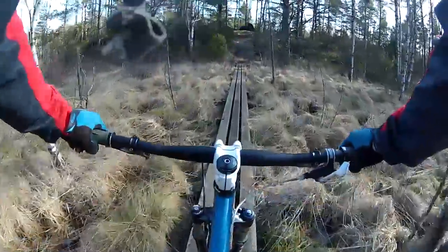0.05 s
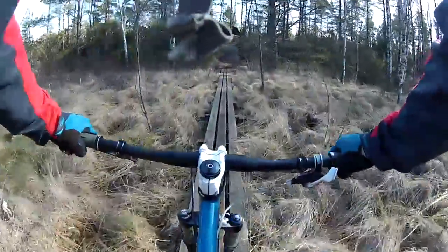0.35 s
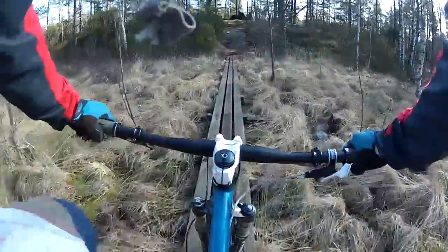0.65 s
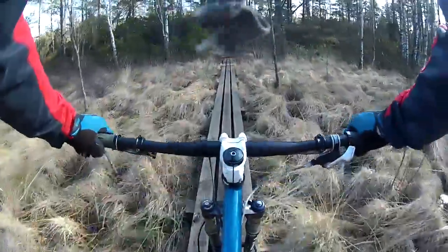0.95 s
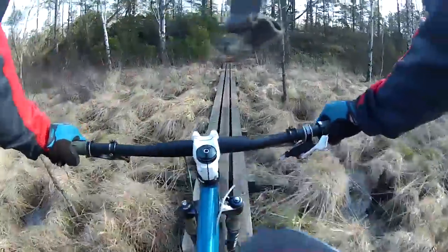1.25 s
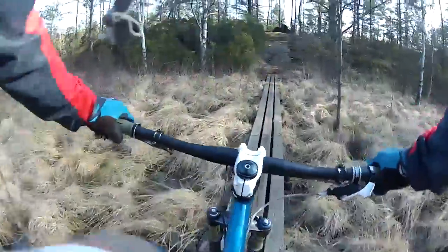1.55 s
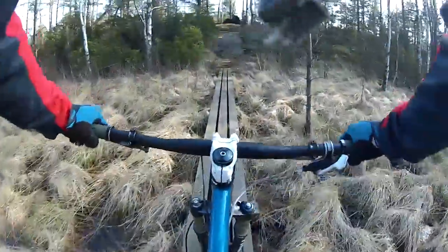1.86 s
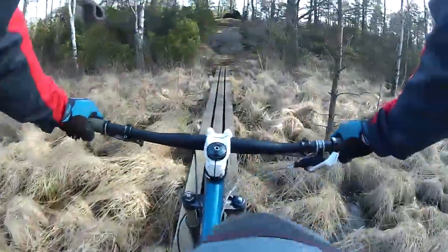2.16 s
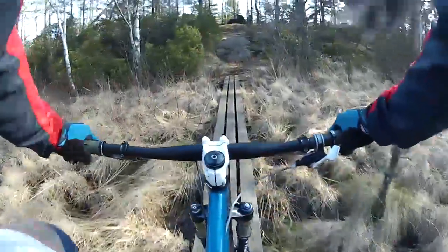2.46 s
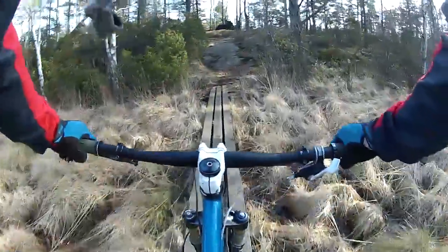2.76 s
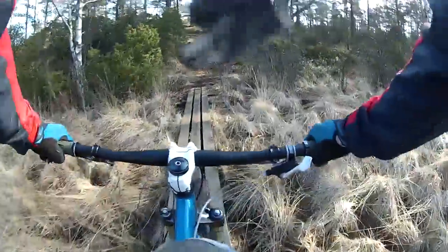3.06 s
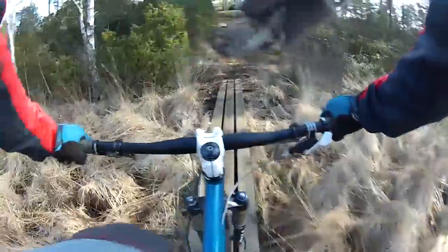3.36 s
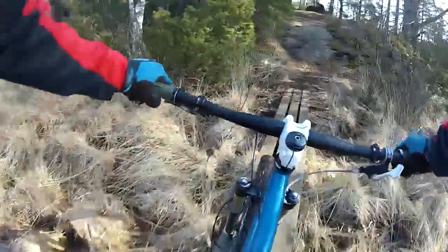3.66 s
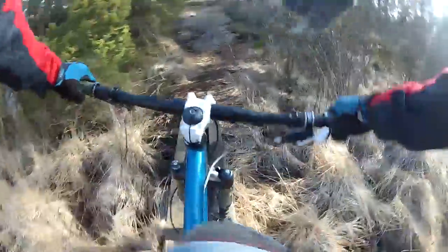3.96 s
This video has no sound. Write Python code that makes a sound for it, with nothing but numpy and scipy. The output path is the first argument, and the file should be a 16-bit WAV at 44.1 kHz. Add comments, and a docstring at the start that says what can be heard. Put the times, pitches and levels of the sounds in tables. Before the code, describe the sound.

Mountain bike tyres rumble over planks, with soft regular thumps and occasional sharp rattles.

```python
"""On a plank boardwalk, a mountain bike rolls along, heard from a cased camera on the rider's chest.
The ride rumbles, the planks drone, and tyres and air make a soft rush that swells now and then.
Soft low thumps come three times a second, probably the rider's pulse through the chest strap.
Jolts bump the case, scrape the jacket across it and make the camera mount clack."""
import sys
import numpy as np
from scipy.fft import rfft, irfft, next_fast_len
from scipy.io import wavfile
from scipy.ndimage import map_coordinates

SR = 44100
rng = np.random.default_rng(int(sys.argv[2]) if len(sys.argv) > 2 else 0)


def store_wav(level_fs):
    """Save 16-bit WAV to argv[1]."""
    pcm = np.round(np.clip(np.atleast_2d(level_fs), -1, 1) * 32767)
    wavfile.write(sys.argv[1], SR, pcm.T.astype(np.int16))


N = 176400  # 4 seconds


def amp(db):
    """Turn decibels into a number to multiply by."""
    return 10 ** (np.asarray(db) / 20)


def unit(x):
    """Scale a sound to an average (rms) level of 1."""
    return x / np.sqrt(np.mean(x ** 2) + 1e-20)


def along(points, hz):
    """Read between (frequency_hz, value) points on a log frequency scale."""
    frequencies, values = np.transpose(points)
    return np.interp(np.log(hz + 1), np.log(frequencies + 1), values)


def curve(rows):
    """Join (time_s, value) points with straight lines, one value per sample."""
    return np.interp(np.arange(N) / SR, *np.transpose(rows))


def bell(hz, centre, half_width):
    """A hump of height 1 around the centre."""
    return 1 / (1 + ((hz - centre) / half_width) ** 2)


def wobble(per_s):
    """A smooth curve through per_s random values a second."""
    values = rng.standard_normal(int(N * per_s / SR) + 4)
    return map_coordinates(values, [np.arange(N) * per_s / SR])


def slips(per_s, spread_db):
    """Tiny random clicks of uneven size."""
    clicks = (rng.random(N) < per_s / SR) * rng.choice([-1, 1], N)
    return unit(clicks * amp(spread_db * rng.standard_normal(N)))


def coloured(x, gain):
    """Filter x so that each frequency is multiplied by gain(hz)."""
    size = 2 * next_fast_len(len(x))
    gains = np.maximum(gain(np.fft.rfftfreq(size, 1 / SR)), 1e-6)
    cepstrum = irfft(np.log(gains))
    # folding this in half makes the filter ring after a hit, never before it
    cepstrum[1:size // 2] *= 2
    cepstrum[size // 2 + 1:] = 0
    return irfft(rfft(x, size) * np.exp(rfft(cepstrum)), size)[:len(x)]


# Tone of the shaking: frequency_hz, gain_db
RUMBLE_TONE = [(10, -17), (20, 6), (33, 0.5), (50, -6), (80, -6.5), (120, -10.5), (180, -19.5),
               (300, -36.5), (800, -73.5)]
# Loudness of the shaking: time_s, level_db
RUMBLE_LEVEL = [(0, -53.5), (1.0, -53), (2.0, -51), (3.0, -50.5), (3.5, -51.5), (4, -52)]

def ride_rumble():
    """The shaking of the ride reaches the camera as a deep, unsteady rumble."""
    shake = unit(coloured(rng.standard_normal(N), lambda hz: amp(along(RUMBLE_TONE, hz))))
    swing_db = 4 * wobble(per_s=15)
    return shake * amp(curve(RUMBLE_LEVEL) + swing_db)


# Tone of the boardwalk: frequency_hz, gain_db
PLANK_TONE = [(60, -15.5), (130, 0), (200, -1), (300, -3.5), (450, -9.5), (700, -16), (1200, -21.5),
              (3000, -78)]
# Loudness of the boardwalk: time_s, level_db
PLANK_LEVEL = [(0, -62.5), (2, -60.5), (3, -61), (4, -58)]

def plank_drone():
    """The boardwalk drones evenly under the wheels."""
    drone = unit(coloured(rng.standard_normal(N), lambda hz: amp(along(PLANK_TONE, hz))))
    return drone * amp(curve(PLANK_LEVEL))


# Tone of the rolling tyres: frequency_hz, gain_db
TYRE_TONE = [(300, -24), (600, -13.5), (900, -11), (1200, -3), (1800, -1), (2200, -3), (2550, -9),
             (2950, -19), (3500, -10.5), (4300, -20.5), (5300, -21), (6000, -34.5), (6700, -25),
             (8500, -21), (9050, -26.5), (10200, -12), (11300, -32.5), (12700, -31), (13900, -15),
             (15000, -29), (15800, -38)]
# Loudness of the rolling tyres: time_s, level_db
TYRE_LEVEL = [(0, -59), (.35, -61), (1.0, -62), (1.3, -55.5), (1.6, -59), (2.0, -59.5), (2.4, -61),
              (2.7, -57), (3.0, -58.5), (3.4, -55.5), (3.75, -59), (4, -48)]

def tyre_rush():
    """Tyres roll on the planks with a slightly gritty, fluttering rush."""
    tread = rng.standard_normal(N) + amp(-8) * slips(per_s=200, spread_db=2)
    rush = unit(coloured(tread, lambda hz: amp(along(TYRE_TONE, hz))))
    flutter_db = 1.23 * wobble(per_s=45)
    return rush * amp(curve(TYRE_LEVEL) + flutter_db)


# What a swell adds to the tyres' tone: frequency_hz, gain_db
SWELL_TONE = [(300, -8), (800, -2), (1300, -0.5), (2000, 0), (2900, -3), (5000, -3), (8500, -3),
              (10200, 2.5), (14000, 2)]
# Swells of tyre noise: middle_s, level_db, half_length_s, pitch_hz
SWELLS = [(0.119, -56.5, 0.025, 1790), (0.639, -56.5, 0.051, 1700), (0.929, -58, 0.017, 1790),
          (1.208, -59, 0.038, 1730), (1.439, -61.5, 0.036, 1810), (1.680, -45, 0.027, 1670),
          (1.75, -51, 0.02, 1770), (1.86, -57.5, 0.067, 1750), (2.312, -56, 0.047, 1850),
          (2.841, -51.5, 0.018, 1720), (3.20, -55.5, 0.048, 1780), (3.286, -52, 0.035, 1540),
          (3.41, -53, 0.049, 1640), (3.539, -46, 0.029, 1740), (3.641, -49.5, 0.045, 1840)]

def tyre_swells():
    """The tyres rasp louder for a moment, each time around a slightly different pitch."""
    out = np.zeros(N + SR)
    from_middle_s = (np.arange(SR // 2) - SR // 4) / SR
    for middle_s, level_db, half_length_s, pitch_hz in SWELLS:
        def gain(hz):
            peak_db = 6.5 * bell(hz, pitch_hz, half_width=pitch_hz / 5)
            return amp(along(TYRE_TONE, hz) + along(SWELL_TONE, hz) + peak_db)
        rasp = unit(coloured(rng.standard_normal(len(from_middle_s)), gain))
        fade = np.exp(-.5 * (from_middle_s / half_length_s) ** 2)
        out[round(middle_s * SR):][:len(rasp)] += amp(level_db) * rasp * fade
    flutter_db = 1.2 * wobble(per_s=90)
    return out[SR // 4:][:N] * amp(flutter_db)  # the shift centres each swell on middle_s


# Low thumps: middle_s, level_db, half_length_s, pitch_hz, heave_db (compared with the beat)
THUMPS = [(.107, -32, .018, 101, -3.5), (.437, -34, 0.015, 94, 1), (0.767, -31, .016, 85.5, -8.5),
          (1.1, -35.5, .019, 100, -5.5), (1.42, -31, 0.016, 103, -9), (1.746, -37.5, 0.016, 105, 0.5),
          (2.079, -27, 0.013, 79, -19), (2.412, -34.5, 0.016, 92, -4.5), (2.732, -37, 0.024, 104, 0),
          (3.053, -36, 0.018, 102.3, 0.5), (3.39, -26.5, .013, 82.4, -18), (3.715, -36, 0.014, 85.5, 1)]

def pulse_thumps():
    """Each thump, probably the rider's pulse, is a short, rough, low beat on one slow heave."""
    heave_hz, heave_s, tick_hz = 36.3, 0.028, 12010
    t, out = np.arange(N) / SR, np.zeros(N)
    waver = 0.41 * wobble(per_s=70)
    roughness = amp(-22) * wobble(per_s=120)
    for middle_s, level_db, half_length_s, pitch_hz, heave_db in THUMPS:
        from_middle_s = t - middle_s
        phase = 2 * np.pi * pitch_hz * from_middle_s + waver
        fade = np.exp(-np.abs(from_middle_s / half_length_s) ** 3.9)
        beat = fade * (np.cos(phase) + roughness * np.sin(1.98 * phase))
        heave = np.exp(-(from_middle_s / heave_s) ** 2) * np.cos(2 * np.pi * heave_hz * from_middle_s)
        out -= amp(level_db) * (beat + amp(heave_db) * heave)
    tick = amp(-37) * np.sin(2 * np.pi * tick_hz * t)  # faint and very high, rides on each thump
    return out * (1 + tick)


# Broad tone of the camera case: frequency_hz, gain_db
CASE_TONE = [(520, -19.5), (750, -12), (1000, -4.5), (1200, -3.5), (1450, -5.5), (1700, -2), (2250, -2.5),
             (2500, -7), (3400, -4.5), (3900, -13), (5300, -16.5), (6000, -34.5), (6500, -20), (7900, -20),
             (8600, -9.5), (9200, -14.5), (10300, -15), (10900, -25.5), (11500, -49), (12600, -38),
             (13200, -26), (13900, -13.5), (15100, -18), (15600, -20)]
# Narrow peaks and dips of the case: frequency_hz, half_width_hz, gain_db
CASE_RINGS = [(1190, 33, 3.5), (1370, 34, 2), (1703, 41, 4), (1870, 20, 1), (2203, 17, 4), (2850, 58, 2),
              (3060, 88, -9), (3290, 61, 5.5), (3590, 38, 2.5), (4664, 69, 7), (4840, 120, -8.5),
              (7270, 54, -1), (7440, 70, 5.5), (8750, 130, 2.5), (8920, 70, -11), (9440, 130, 3.5)]

def case_gain(hz):
    """The camera case rings at some frequencies, muffles others and weakens the bass."""
    rings_db = sum(db * bell(hz, centre, half_width) for centre, half_width, db in CASE_RINGS)
    bass_cut = hz / np.hypot(hz, 413)  # fades below 413 Hz
    return amp(along(CASE_TONE, hz) + rings_db) * bass_cut


# Tone of the rubbing cloth: frequency_hz, gain_db
CLOTH_TONE = [(300, -20), (800, -8), (1700, -0.5), (2400, 1.5), (3400, 4), (6000, 2.5), (9000, 1.5),
              (15000, -2)]
# Strokes of the jacket: start_s, peak_s, end_s, level_db (at peak_s), rise_db, fall_db
SCRAPES = [(.22, 0.264, 0.29, -60, 16, 14), (1.113, 1.175, 1.246, -55.5, 18.5, 16),
           (1.259, 1.278, 1.3, -48.5, 8, 15), (1.338, 1.359, 1.41, -42, 9, 11),
           (2.116, 2.175, 2.23, -39, 12.5, 12), (2.22, 2.225, 2.44, -49.5, -8, 32),
           (2.56, 2.564, 2.6, -51.5, 3, 11), (2.589, 2.599, 2.606, -42.5, 8.5, 1),
           (2.655, 2.665, 2.7, -42, 20, 50), (3.377, 3.458, 3.59, -43.5, 14.5, 20),
           (3.6, 3.605, 3.74, -56.5, 7, 8), (3.715, 3.845, 3.95, -40.5, 20, 8.5),
           (3.902, 3.903, 3.97, -33, 3, 18.5), (3.952, 3.99, 4.02, -44.5, 15.5, -9)]

def jacket_scrapes():
    """Cloth sticks and slips on the case in strokes that swell and fade."""
    strokes, silent_db = np.zeros(N), -120
    for start_s, peak_s, end_s, level_db, rise_db, fall_db in SCRAPES:
        outline = [(start_s - .03, silent_db), (start_s, level_db - rise_db), (peak_s, level_db),
                   (end_s, level_db - fall_db), (end_s + 0.0097, silent_db)]
        strokes += amp(curve(outline))
    friction = slips(per_s=1900, spread_db=5) + 0.71 * rng.standard_normal(N)
    cloth = unit(coloured(friction, lambda hz: case_gain(hz) * amp(along(CLOTH_TONE, hz))))
    flutter_db = 2 * wobble(per_s=110)
    return cloth * strokes * amp(flutter_db)


# Tone of a jolt's dull thud: frequency_hz, gain_db
THUD_TONE = [(50, -8), (150, 5), (260, 1), (450, -13.5), (800, -13), (1500, -30), (4000, -70)]
# Jolts of the whole case: start_s, level_db, pitch_hz, thud_db (added to level_db)
BUMPS = [(1.267, -47, 131, 4.5), (1.339, -42, 153, 3), (2.208, -45, 147, 0.5), (2.605, -40, 91, -5.5),
         (2.667, -44, 80, -3), (2.925, -28.5, 32.3, -26), (3.29, -37.5, 75, -9.5), (3.905, -27, 172, -2.5)]

def case_bumps():
    """A jolt bumps the whole case, making a short low knock and a dull thud."""
    rise_s, fade_s = 0.0017, 0.083
    out, t = np.zeros(N + SR), np.arange(SR // 4) / SR
    for start_s, level_db, pitch_hz, thud_db in BUMPS:
        knock = np.sin(2 * np.pi * pitch_hz * t)
        thud = unit(coloured(rng.standard_normal(len(t)), lambda hz: amp(along(THUD_TONE, hz))))
        loudness = amp(level_db - 60 * t / fade_s) * (1 - np.exp(-t / rise_s))
        out[round(start_s * SR):][:len(t)] += loudness * (knock + amp(thud_db) * thud)
    return out[:N]


# Tone of the hard contact: frequency_hz, gain_db
CLACK_TONE = [(300, 4), (600, 3.5), (950, -2), (1300, -1), (2400, 0.5), (5000, 0), (15000, 0)]
# Clacks of the mount: start_s, level_db, length_s, ring_hz, treble_db
CLACKS = [(0.056, -53.5, 0.0034, 1800, -16), (0.255, -53.5, .003, 3000, 0),
          (0.288, -48, 0.0031, 1800, -3.5), (.804, -50, .003, 1900, 4.5), (1.015, -54.5, 0.0026, 1900, -9),
          (1.134, -59, .003, 3000, 3), (1.2656, -30, 0.0024, 2680, 7), (1.269, -38, 0.0032, 1990, -8),
          (1.3394, -29, .002, 2310, 3.5), (1.3411, -20.5, 0.0026, 2230, 0.5),
          (1.6426, -47, 0.0023, 1600, -2), (1.798, -42.5, 0.0033, 1330, -34),
          (2.076, -43.5, 0.0028, 1490, -6), (2.122, -39, 0.0037, 1390, -14), (2.149, -35, .002, 1600, 1),
          (2.1716, -33, 0.0038, 1700, 3), (2.2038, -29, 0.0038, 1900, -2),
          (2.2076, -23.5, .002, 1260, -2.5), (2.2096, -20, 0.0021, 1720, 1), (2.2203, -28, 0.0047, 1840, 2),
          (2.553, -31, 0.0023, 2200, -1.5), (2.571, -35.5, 0.0027, 2073, -6),
          (2.6668, -31, 0.0017, 1470, 1), (3.293, -46, 0.004, 1970, -1), (3.3745, -45, 0.0028, 2290, 1),
          (3.459, -38.5, 0.0051, 1800, -1), (3.769, -40, 0.0021, 3460, 9), (3.787, -42.5, 0.0026, 3340, 11),
          (3.827, -54, .003, 2000, 10), (3.862, -45, 0.0014, 2000, -14), (3.87, -35, 0.0045, 3220, 9),
          (3.9038, -20.5, 0.0028, 1150, 4), (3.9062, -20.5, 0.0025, 2870, 4),
          (3.9154, -20, .0024, 1560, 0.5), (3.9218, -22.5, 0.0018, 1780, 0),
          (3.9312, -24.5, 0.003, 2300, -1)]

def mount_clacks():
    """The mount chatters for a few thousandths of a second and sets the case ringing."""
    tail_db, tail_fade_s, treble_hz = -17.5, 0.033, 2960
    out, t = np.zeros(N + SR), np.arange(SR // 10) / SR
    for start_s, level_db, length_s, ring_hz, treble_db in CLACKS:
        def gain(hz):
            ring_db = 8 * bell(hz, ring_hz, half_width=ring_hz / 6)
            bright_db = treble_db * hz ** 4 / (hz ** 4 + treble_hz ** 4)
            # only a little sound gets through below about half the ringing pitch
            bass_cut = hz ** 6 / np.hypot(hz ** 6, (0.51 * ring_hz) ** 6) + amp(-18)
            return case_gain(hz) * bass_cut * amp(along(CLACK_TONE, hz) + ring_db + bright_db)
        contact = np.exp(-(t / length_s) ** 2) + amp(tail_db - 60 * t / tail_fade_s)
        clack = coloured(contact * rng.standard_normal(len(t)), gain)
        clack *= np.sqrt(length_s * SR) / np.linalg.norm(clack)  # longer clacks carry more energy
        out[round(start_s * SR):][:len(t)] += amp(level_db) * clack
    return out[:N]


def scene():
    """Add the sounds at the rider's chest to the sounds of the ride, in one channel."""
    chest = pulse_thumps() + mount_clacks() + case_bumps() + jacket_scrapes()
    ride = tyre_rush() + tyre_swells() + plank_drone() + ride_rumble()
    return (chest + ride)[None]


def record(dry):
    """The camera keeps nothing above its highest frequency."""
    top_hz = 15650
    size = next_fast_len(N + SR // 2)
    kept = np.fft.rfftfreq(size, 1 / SR) < top_hz
    return irfft(rfft(dry, size) * kept, size)[:, :N]


dry = scene()
out = record(dry)
store_wav(out)
```